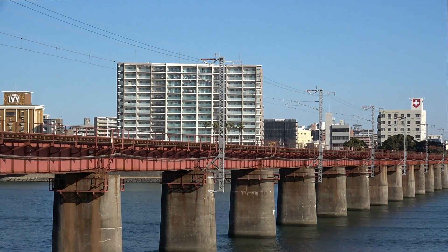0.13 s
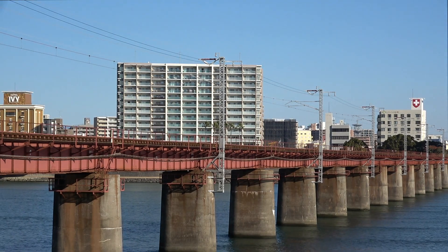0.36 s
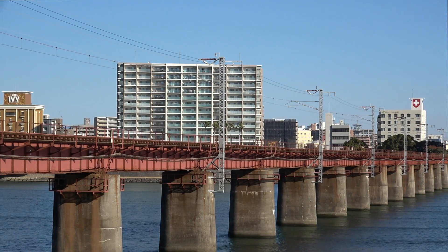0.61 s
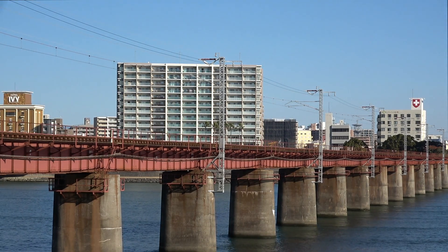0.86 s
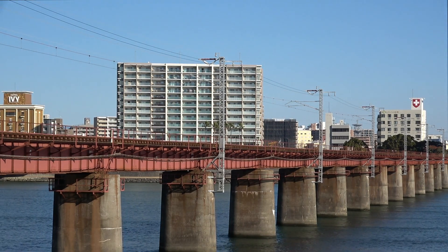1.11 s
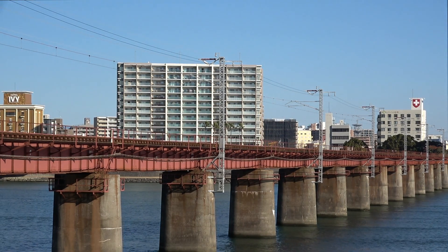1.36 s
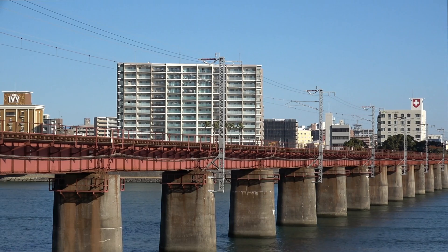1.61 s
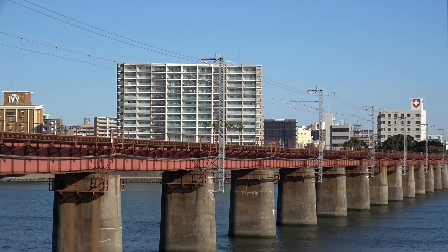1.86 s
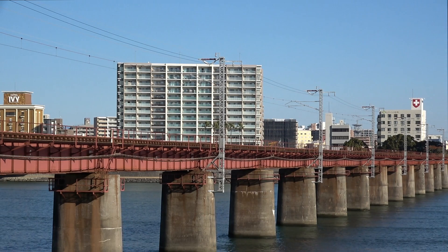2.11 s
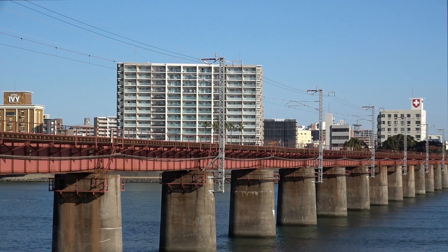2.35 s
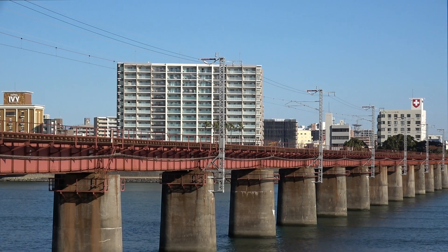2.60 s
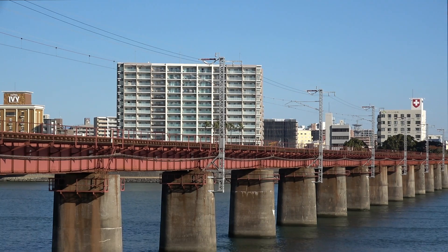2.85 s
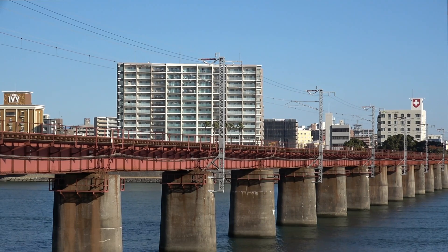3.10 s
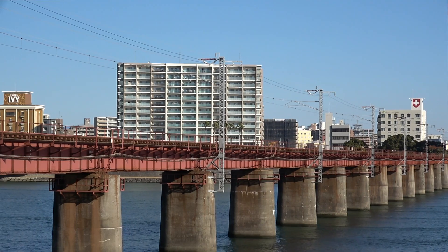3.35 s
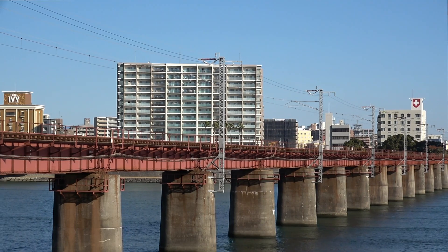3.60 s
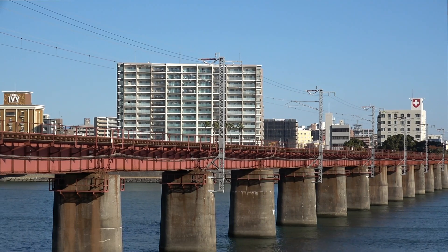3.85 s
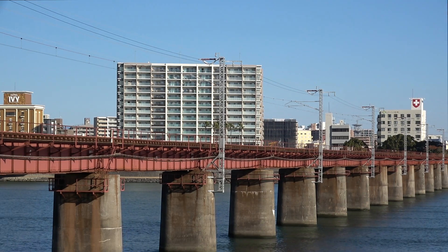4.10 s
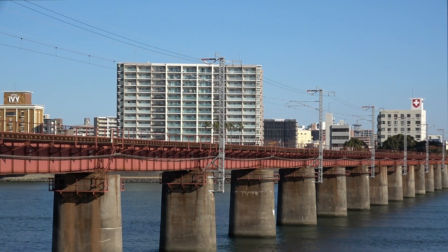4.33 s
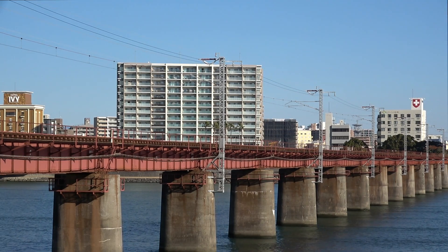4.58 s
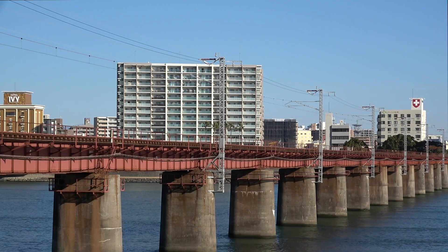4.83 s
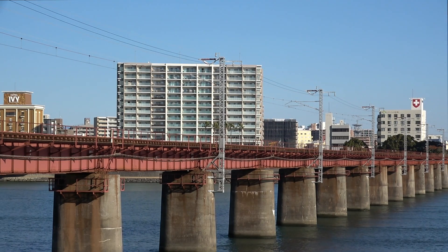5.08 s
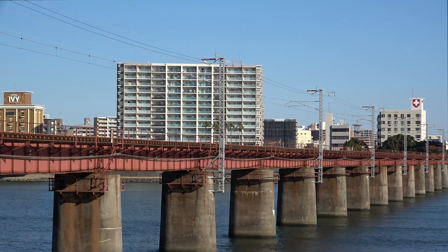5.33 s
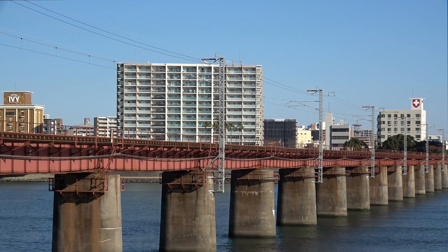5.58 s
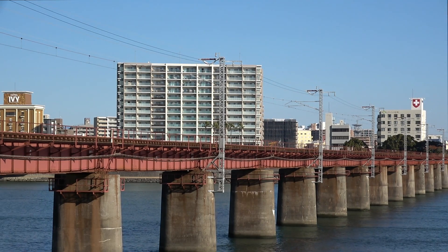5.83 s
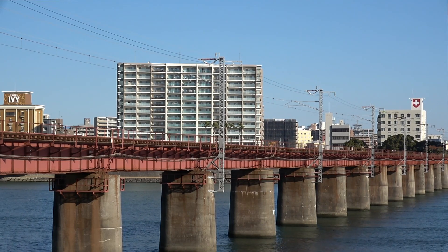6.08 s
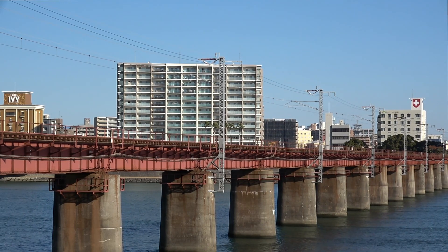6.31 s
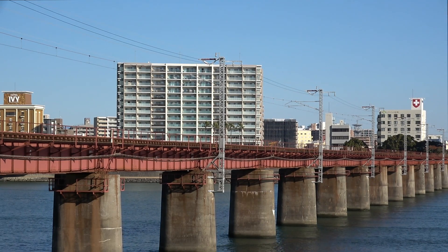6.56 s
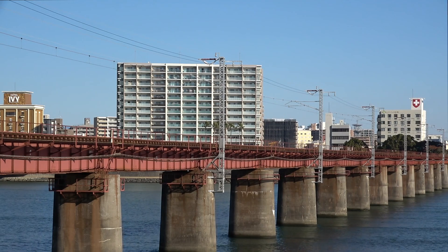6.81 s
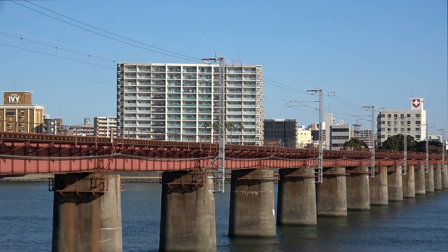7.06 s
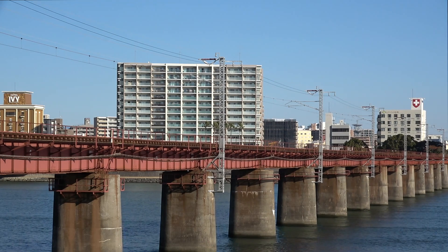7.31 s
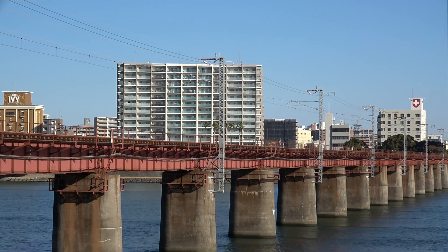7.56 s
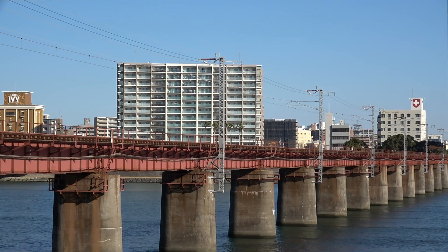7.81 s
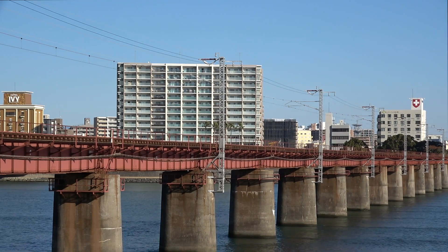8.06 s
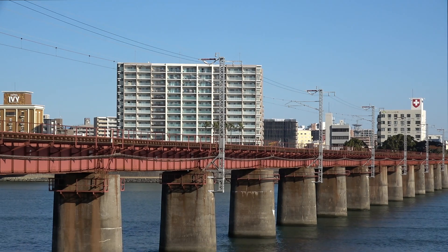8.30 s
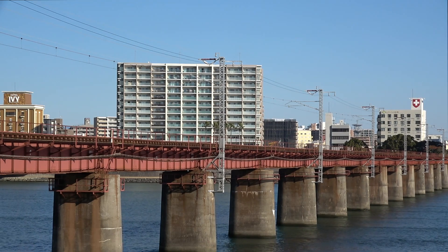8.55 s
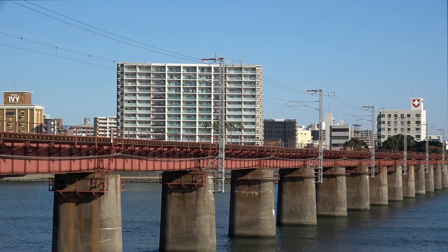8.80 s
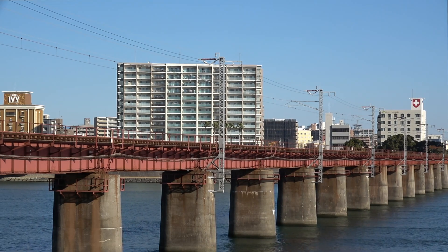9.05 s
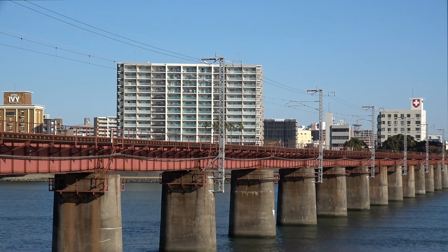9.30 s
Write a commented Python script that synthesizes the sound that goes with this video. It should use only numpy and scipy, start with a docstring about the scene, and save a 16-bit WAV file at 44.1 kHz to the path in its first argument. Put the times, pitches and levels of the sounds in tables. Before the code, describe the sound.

Already at full force, a passing train makes the bridge thunder: deep deck boom, rough girder roar, metallic clacks and ringing wheel rims. The last wheels pass by two seconds, then joint knocks continue evenly into the distance, softening with humming girders. After seven seconds mostly steady far traffic and water murmur remain, with faint distant knocks and one sliding bird whistle. Open riverside, stereo microphone, brighter left, slight far-bank echo.

```python
"""Train leaving a steel girder bridge

An electric train has just passed on a girder bridge over a river and rolls away, its treble stronger at left.
Girders roar and boom as banded noise; knocks over rail joints are noise bursts with beating span and rail modes.
Wheel rims, deck and girders ring as noise through narrow resonances; short squeals are falling tones.
Behind: a far-bank echo, one whistled bird call with its wall echo, and town murmur as steady banded noise."""
import sys
import numpy as np
from scipy import signal
from scipy.fft import rfft, irfft, next_fast_len
from scipy.io import wavfile

SR = 44100
rng = np.random.default_rng(int(sys.argv[2]) if len(sys.argv) > 2 else 0)


def makeup_ratio(level_db):
    """Linear amplitude ratio for a level in decibels (20 dB per factor of ten)."""
    decades = np.asarray(level_db, float) / 20
    return 10 ** decades


def log_audio(samples):
    """Write samples as a 16-bit WAV file to the path given in sys.argv[1]."""
    # one column per channel
    frames = np.atleast_2d(samples).T
    # limit to full scale, then quantise
    limited = np.clip(frames, -1, 1)
    pcm = np.round(limited * 32767).astype(np.int16)
    wavfile.write(sys.argv[1], SR, pcm)


N = 415422
STEP = 32   # samples per control step
TIME = np.arange(N // STEP + 2) * STEP / SR
BANDS = 22 * 2 ** (np.arange(30) / 3.15)   # band edges, Hz
BAND_HZ = np.sqrt(BANDS[1:] * BANDS[:-1])
RUN_IN = 4096   # samples


def at_hz(points, hz):
    """Spectrum table read on a log axis, falling away outside its ends."""
    f, db = np.transpose(points)
    outside = np.maximum(np.log2(f[0] / hz), 0) + np.maximum(np.log2(hz / f[-1]), 0)
    return np.interp(np.log(hz), np.log(f), db) - 30 * outside


def in_time(rows):
    """Curve columns at the control rate."""
    s, *columns = np.transpose(rows)
    return [np.interp(TIME, s, c) for c in columns]


def full_rate(slow):
    """Control rate to sample rate."""
    return np.interp(np.arange(N) / STEP, np.arange(len(slow)), slow)


def drift(rate_hz):
    """Slow chance at the control rate: twice-lowpassed noise, spread 1."""
    r = np.exp(-2 * np.pi * rate_hz * STEP / SR)
    slow = signal.lfilter([1], [1, -2 * r, r * r], rng.standard_normal(len(TIME) + 2000))[2000:]
    return slow / np.std(slow)


def gate(start, end, edge_s):
    """One between start + edge and end, with linear edges."""
    return np.clip(np.minimum(TIME - start, end + edge_s - TIME) / edge_s, 0, 1)


def band_power(spectrum, db):
    """Power per band and time of a spectrum whose whole level follows db."""
    share = makeup_ratio(at_hz(spectrum, BAND_HZ)) ** 2 * np.diff(BANDS)
    return np.outer(share / share.sum(), makeup_ratio(db) ** 2)


def band(k, x):
    """One band of the bank; white noise of spread 1 leaves with spread 1."""
    sos = signal.butter(3, BANDS[k:k + 2], "band", fs=SR, output="sos")
    # mirrored run-in: the sound is already going at the start
    run_in = np.concatenate([x[..., RUN_IN:0:-1], x], axis=-1)
    return signal.sosfilt(sos, run_in)[..., RUN_IN:] * np.sqrt(SR / 2 / (BANDS[k + 1] - BANDS[k]))


def resonance(gain, hz, width_hz):
    """Noise under a slow gain, twice through one narrow resonance; spread 1 for gain 1."""
    r = np.exp(-np.pi * width_hz / SR)
    b = [(1 - r * r) / 2, 0, (r * r - 1) / 2]
    a = [1, -2 * r * np.cos(2 * np.pi * hz / SR), r * r]
    noise = rng.standard_normal(N) * full_rate(gain) * np.sqrt(2 * SR / np.pi / width_hz)
    return signal.lfilter(b, a, signal.lfilter(b, a, noise))


# last wheels rolling away [t/s, roar level/dB, distance/m]
TRAIN = [(0, -14.5, 7.2), (.42, -17.5, 14), (.7, -14.5, 16), (1.2, -20.5, 9.4), (1.5, -21.5, 16),
         (2.12, -19.5, 17), (2.4, -25.5, 27), (2.83, -31, 27), (3.3, -30.5, 38), (3.7, -36, 49),
         (4.2, -36.5, 93), (5, -40.5, 160), (5.4, -41, 230), (6.1, -40, 220), (6.6, -38.5, 190),
         (7.05, -41, 410), (9.42, -41, 380)]
# bogie on a span, deck held booming [from t/s, to t/s, boom level/dB, roar level/dB]
BOGIES = [(-.1, 0.157, -22.5, -18), (0.625, 0.878, -15.5, -16.5), (0.98, 1.237, -17.5, -13.5),
          (1.227, 1.369, -24, -39), (1.813, 2.083, -16, -12.5), (8.423, 8.678, -35.5, -40.5)]
# spectrum shapes of rumble, deck boom, girder roar, rail hiss [f/Hz, level/dB per Hz]
RUMBLE = [(12, -38), (20, -14), (48, 5), (92, 1.5), (120, -9.5), (160, -27.5), (260, -120)]
BOOM = [(53, -36), (90, -11.5), (103, -6), (135, 0), (189, -2.5), (226, -2), (264, -7.5), (330, -2.5),
        (430, -30), (730, -120)]
ROAR = [(120, -36), (200, -4), (240, -2), (300, -4.5), (519, -3), (741, -5), (1080, -10.5), (1300, -14.5),
        (1500, -19.5), (2000, -20.5), (2600, -55), (4400, -120)]
RAIL_HISS = [(1400, -1.5), (1830, -6.5), (2560, -6), (2890, -6), (3330, -14.5), (5000, -24), (7000, -31),
             (10000, -45.5), (15500, -65.5)]
# levels at -30 dB roar, and share of the roar's swing
BOOM_DB, BOOM_FOLLOWS = -34.0, 0.67
HISS_DB, HISS_FOLLOWS = -44.0, 0.75
# rumble through ground and piers: level at 10 m, loss per doubling of distance, rise on the long girders
RUMBLE_DB, RUMBLE_DB_PER_DOUBLING, GIRDER_RUMBLE_DB = -27.5, 3, 2


def train(patchy_db=2.0, together_db=0.5):
    """Rough steel on steel as noise band by band, dulled by air, with knocks and resonances on top."""
    roar_db, distance_m = in_time(TRAIN)
    boom_db = BOOM_DB + BOOM_FOLLOWS * (roar_db + 30)
    hiss_db = HISS_DB + HISS_FOLLOWS * (roar_db + 30)
    rumble_db = RUMBLE_DB - RUMBLE_DB_PER_DOUBLING * np.log2(distance_m / 10)
    rumble_db = rumble_db + GIRDER_RUMBLE_DB * gate(ENTER_S, LEAVE_S, .3)
    knocks, ticks = joints()
    treble = band_power(RAIL_HISS, hiss_db)
    deck = sum(makeup_ratio(db) * gate(start, end, 0.0039) for start, end, db, _ in BOGIES)
    girders = sum(makeup_ratio(db) * gate(start, end, 0.026) for start, end, _, db in BOGIES)
    rolling = band_power(RUMBLE, rumble_db) + band_power(RUMBLE, piers())
    rolling = rolling + band_power(BOOM, boom_db) + band_power(ROAR, roar_db) + treble
    rolling = rolling + band_power(BOOM, [0]) * deck ** 2 + band_power(ROAR, [0]) * girders ** 2
    power = rolling * makeup_ratio(together_db * drift(20)) ** 2 + knocks
    power = power * makeup_ratio(-air_db(BANDS[1:], distance_m)) ** 2
    white = rng.standard_normal((2, N))      # neighbouring bands get unrelated noise
    out = 0
    for k, p in enumerate(power):
        gain = full_rate(np.sqrt(p) * makeup_ratio(patchy_db * drift(10.2)))
        out = out + band(k, white[k % 2] * gain)
    out = out + deck_modes(deck) + girder_hum() + drone() + squeals() + span_rings()
    return out + rims(treble.sum(axis=0) + ticks, distance_m)


AIR_DB_PER_M_AT_4K = 0.05


def air_db(hz, distance_m):
    """Air swallows the treble with distance."""
    return AIR_DB_PER_M_AT_4K * np.multiply.outer((np.asarray(hz) / 4000) ** 1.9, distance_m)


ENTER_S, LEAVE_S = 2.3, 5.05


def on_girders(s):
    """One while the wheels are on the long girders."""
    return float(ENTER_S < s < LEAVE_S)


# knock parts against its level; clack and tick rise with their share of the sharpness
THUD_DB, CLACK_DB, CLACK_FOLLOWS, TICK_DB, TICK_FOLLOWS = -14.5, -15, 0.82, -25.5, 1.2
GIRDER_THUD_DB, GIRDER_CLACK_DB = 2.5, 2   # rise on the long girders


def clack_db(s, db, sharp_db):
    """Clack level: sharper knocks and the long girders clang more."""
    return db + CLACK_DB + CLACK_FOLLOWS * sharp_db + GIRDER_CLACK_DB * on_girders(s)


# wheels on rail joints, mostly a bogie's two axles in turn
# [t/s, level/dB, sharpness/dB, span f/Hz, t60/s]; also played by span_rings and piers
JOINTS = [(0.009, -5, 3.5, 277, 0.18), (0.488, 0.5, -2, 533, 0.087), (0.606, -9, 9, 467, 0.19),
          (0.732, -9, 7.5, 383, 0.41), (0.984, -9.5, 8.5, 561, 0.9), (1.109, -5.5, 11.5, 335, 0.3),
          (1.339, -11.5, 2, 531, 0.19), (1.484, -8.5, 0, 272, 0.16), (1.689, -9.5, 2, 304, 0.24),
          (1.829, -8, 11.5, 573, 0.41), (1.96, -2.5, 8.5, 248.5, 0.38), (2.334, -7.5, 3.5, 295, 0.22),
          (2.463, -9, 6.5, 251, 0.23), (2.546, -13.5, 0.7, 298, 0.4), (2.602, -9.5, 2, 263, 0.12),
          (2.671, -16, 4.5, 309, 0.28), (2.724, -12.5, 1.8, 250, 0.19), (2.811, -14.5, -4, 433, 0.087),
          (2.934, -8, -3.5, 334, 0.14), (3.063, -11, -4.5, 346, 0.14), (3.198, -9, 2, 303, 0.24),
          (3.329, -9, 3.5, 287, 0.32), (3.464, -12.5, 1.2, 280, 0.19), (3.593, -14, 0.8, 290, 0.2),
          (3.714, -25, 1, 283, 0.15), (3.808, -12, -5, 295, 0.61), (3.866, -15, 0.5, 363, 0.18),
          (3.924, -15.5, 1, 349, 0.34), (3.992, -10.5, 0.5, 299, 0.17), (4.05, -16.5, 1.5, 254, 0.18),
          (4.205, -16, 0, 309, 0.29), (4.339, -14, 1, 294, 0.16), (4.475, -12.5, -23, 386, 0.091),
          (4.611, -18.5, -4, 394, 0.096), (4.756, -15, 3.5, 262, 0.15), (4.814, -20.5, 3.5, 292, 0.15),
          (4.894, -11.5, 1, 286, 0.19), (4.959, -28.5, 11.5, 435, 0.11), (5.113, -13, -3.5, 316, 0.22),
          (5.25, -12, -2.5, 359, 0.15), (5.38, -13.5, -20, 490, 0.081), (5.528, -10, -1, 319, 0.17),
          (5.666, -12, 4, 351, 0.17), (5.802, -16, -24, 398, 0.13), (5.933, -19.5, -1, 380, 0.18),
          (6.467, -13.5, 1.5, 338, 0.18), (6.612, -12.5, -0.7, 318, 0.16), (6.733, -20.5, -16, 360, 0.2),
          (6.875, -20, 3, 533, 0.12), (7.266, -27, 7, 364, 0.25), (7.414, -19, -3, 483, 0.068),
          (8.433, -28, 12, 280, 0.09), (8.55, -25.5, 1, 420, 0.54)]
# tick spectrum shape [f/Hz, level/dB per Hz]
TICK = [(1500, 4), (2840, -4.5), (3900, -12), (5500, -23.5), (8000, -30.5), (11000, -35.5), (15500, -40.5)]


def joints(rise_s=0.0018, span_db=-9.0, span_width=0.45, treble_shorter=0.063, clatter_db=2.0,
           hold=1.13, lead=0.68):
    """Each knock is a burst in the steel: low thud, ring of its span, clack and tick; the highs die first."""
    power, ticks = 0, 0
    lasting = (BAND_HZ[:, None] / 300) ** -treble_shorter
    early = np.minimum(lead / np.diff(BANDS), .012)[:, None]      # a narrow band needs time to build up
    clatter = makeup_ratio(clatter_db * drift(45)) ** 2      # axle, fastenings and plates answer unevenly
    for s, db, sharp_db, span_hz, t60 in JOINTS:
        near = slice(max(round((s - .02) * SR / STEP), 0), round((s + .6) * SR / STEP))
        t = np.maximum(TIME[near] - s + early, 0)
        rise = (1 - np.exp(-t / rise_s)) ** 2
        # sound from the length of the span arrives spread out: the burst holds, then drops
        fall = makeup_ratio(-60 * (t / (max(t60, .05) * lasting)) ** hold) ** 2
        dying = np.zeros((len(BAND_HZ), len(TIME)))
        dying[:, near] = rise * fall
        span = [(span_hz * 2 ** (-2 * span_width), -20), (span_hz, 0), (span_hz * 2 ** (2 * span_width), -20)]
        thud_db = db + THUD_DB + GIRDER_THUD_DB * on_girders(s)
        body = band_power([(90, -7), (250, -3)], [thud_db]) + band_power(span, [db + span_db])
        body = body + band_power([(550, -1), (900, 7.0), (1600, -14.5)], [clack_db(s, db, sharp_db)])
        tick = band_power(TICK, [db + TICK_DB + TICK_FOLLOWS * sharp_db]) * dying
        power, ticks = power + body * dying + tick, ticks + tick.sum(axis=0)
    return power * clatter, ticks


def span_rings(ring_db=-11.5, clang_db=-7.5, spread=0.253, rise_s=0.0014, hold=0.93):
    """Every blow sets close modes of its span and the rail going at once: a hard start, then beating."""
    out, t = np.zeros(N + SR), np.arange(SR // 2) / SR
    detune = rng.uniform(-1, 1, (len(JOINTS), 6))
    for (s, db, sharp_db, span_hz, t60), d in zip(JOINTS, detune):
        span = np.sin(2 * np.pi * np.outer(span_hz * 2 ** (spread * d[:3]), t)).sum(axis=0)
        rail = np.sin(2 * np.pi * np.outer(780 * 2 ** (.13 * d[3:]), t)).sum(axis=0)
        dying = (1 - np.exp(-t / rise_s)) * makeup_ratio(-60 * (t / max(t60, .05)) ** hold)
        at = round(s * SR)
        modes = makeup_ratio(db + ring_db) * span + makeup_ratio(clack_db(s, db, sharp_db) + clang_db) * rail
        out[at:at + len(t)] += dying * modes
    return out[:N]


PIER_DB, PIER_T60_S = -18, 0.67   # against the knock


def piers():
    """Level in dB of the low shudder that knocks on the long girders leave in the piers."""
    power = 0
    for s, db, *_ in JOINTS:
        if on_girders(s):
            level_db = db + PIER_DB - 60 * np.maximum(TIME - s, 0) / PIER_T60_S
            power = power + makeup_ratio(level_db) ** 2 * (TIME > s)
    return 10 * np.log10(power + 1e-12)


# nearest deck's modes [f/Hz, width/Hz, level/dB against the boom]
DECK = [(136.5, 7.7, -5), (164, 24, -8.5), (231.4, 51, -3)]


def deck_modes(deck):
    """The deck's narrow modes ring under the bogies' boom."""
    return sum(resonance(deck * makeup_ratio(db), hz, width_hz) for hz, width_hz, db in DECK)


# nearest girders droning as the last coach leaves [until t/s, f/Hz, width/Hz, level/dB]
DRONE = (1.46, 530, 220, -20)


def drone():
    """The nearest girders drone on one broad mode, then fade."""
    until, hz, width_hz, db = DRONE
    return resonance(makeup_ratio(db) * gate(-1, until, 0.18), hz, width_hz)


HUM_HZ, HUM_WIDTH_HZ, HUM_PEAK_DB = 426, 59, -32.5
SWELL_DB_PER_S, SAG_DB_PER_S, LEAVE_DB_PER_S, LEAVE_DB = 2, 1.3, 12, 11.0


def girder_hum():
    """Long girders hum on one mode: swell up to entering, slow sag, extra drop after leaving."""
    sag = SWELL_DB_PER_S * np.maximum(ENTER_S - TIME, 0) + SAG_DB_PER_S * np.maximum(TIME - ENTER_S, 0)
    drop = np.clip(LEAVE_DB_PER_S * (TIME - LEAVE_S), 0, LEAVE_DB)
    return resonance(makeup_ratio(HUM_PEAK_DB - sag - drop), HUM_HZ, HUM_WIDTH_HZ)


# wheel rims and rail [f/Hz, width/Hz, relative level/dB]
RIMS = [(1910, 87, -3.5), (2124, 110, -10), (2790, 190, -3.5), (3420, 380, -22), (3750, 330, -10),
        (4650, 300, -15.5), (5300, 300, -24.5), (5860, 220, -25), (6500, 170, -32), (7470, 150, -30),
        (8800, 220, -35)]
# one rim mode sings out [t/s, length/s, mode f/Hz, rise/dB]
SINGS = [(0.973, 0.05, 2790, 10), (0.978, 0.08, 3750, 6), (.99, .09, 4650, 11), (1.334, .17, 6500, 10),
         (1.7, 0.11, 5860, 13), (2.33, 0.04, 3750, 9), (2.46, 0.09, 3420, 23), (2.8, .08, 2790, 10.5),
         (2.93, .06, 2790, 7.5), (5.677, 0.045, 1910, 14), (5.68, .04, 2790, 7)]
RIMS_DB_PER_DOUBLING = 0.6   # rims sink into the rail hiss with distance


def rims(drive, distance_m, waver_db=2.0, rims_db=-5.0):
    """Rail roughness and ticks drive narrow wheel modes, each swelling on its own."""
    out = 0
    far_db = RIMS_DB_PER_DOUBLING * np.log2(distance_m / 10)
    for hz, width_hz, db in RIMS:
        sings_db = sum(up * gate(s, s + length, .02) for s, length, mode, up in SINGS
                       if abs(mode / hz - 1) < .045)
        level_db = db + sings_db + rims_db + waver_db * drift(1.7) - air_db(hz, distance_m) - far_db
        out = out + resonance(np.sqrt(drive) * makeup_ratio(level_db), hz, width_hz)
    return out


# rubbing flange [t/s, length/s, from f/Hz, to f/Hz, level/dB]
SQUEALS = [(1.285, .085, 2270, 2130, -31), (1.74, .095, 1990, 1860, -32)]


def squeals(waver=.008, octave_db=-16.5, flutter_db=4.0):
    """A flange rubs: wavering tones with a faint octave swell and fade while they fall."""
    out, t = 0, np.arange(N) / SR
    for s, length, from_hz, to_hz, db in SQUEALS:
        share = np.clip((t - s) / length, 0, 1)
        hz = (from_hz + (to_hz - from_hz) * share) * (1 + waver * full_rate(drift(70)))
        level = makeup_ratio(db + flutter_db * full_rate(drift(40))) * np.sin(np.pi * share) ** .7
        phase = 2 * np.pi * np.cumsum(hz) / SR
        out = out + np.sqrt(2) * level * (np.sin(phase) + makeup_ratio(octave_db) * np.sin(2 * phase))
    return out


# bird call [t/s, f/Hz, level/dB]
BIRD = [(8.61, 1970, -48), (8.642, 3420, -47), (8.675, 3700, -52), (8.73, 3620, -46), (8.793, 3370, -43.5),
        (8.799, 3080, -46.5), (8.886, 2520, -42.5), (8.896, 2260, -51), (8.975, 1850, -53)]
BIRD_OCTAVE_DB, BIRD_ECHO_S, BIRD_ECHO_GAIN_DB = -26.5, .165, -9.5


def bird(scatter_s=0.016):
    """A whistle with a faint octave sweeps up and slides down; a far wall returns it scattered."""
    s, hz, db = np.transpose(BIRD)
    t = np.arange(N) / SR
    phase = 2 * np.pi * np.cumsum(np.interp(t, s, hz) * (1 + 0.006 * full_rate(drift(60)))) / SR
    edges = np.clip(np.minimum(t - s[0], s[-1] - t) / 0.0092, 0, 1)
    level = np.sqrt(2) * makeup_ratio(np.interp(t, s, db)) * edges
    call = level * (np.sin(phase) + makeup_ratio(BIRD_OCTAVE_DB) * np.sin(2 * phase))
    wall = rng.standard_normal(SR // 10) * np.exp(-t[:SR // 10] / scatter_s)
    echo = signal.fftconvolve(np.roll(call, round(BIRD_ECHO_S * SR)), wall / np.linalg.norm(wall))[:N]
    # the small wall returns highs best
    echo = signal.sosfilt(signal.butter(2, 3000, "high", fs=SR, output="sos"), echo)
    return call + makeup_ratio(BIRD_ECHO_GAIN_DB) * echo


# town spectrum shape [f/Hz, level/dB per Hz]
TOWN = [(12, -44), (20, -20), (98, 0), (180, -12), (221, -8), (367, -9.5), (403, 4.5), (474, -23),
        (735, -11), (1110, -15), (1730, -20.5), (1980, -26.5), (5000, -72.5), (6500, -92), (11000, -120)]
TOWN_DB = -36
# left-right likeness [f/Hz, likeness/1]
TOWN_LIKENESS = [(60, 0.98), (140, 1), (340, 1), (820, 0.66), (1960, 1), (4700, 0.23)]


def town(patchy_db=0.5):
    """Far traffic and water: banded noise, least alike in the two channels at the top."""
    out, white = 0, rng.standard_normal((2, 2, N))
    for k, p in enumerate(band_power(TOWN, [TOWN_DB])[:26, 0]):
        mid, side = band(k, white[k % 2])
        alike = np.clip(np.interp(BANDS[k], *np.transpose(TOWN_LIKENESS)), 0, 1)
        gain = np.sqrt(p / 2) * full_rate(makeup_ratio(patchy_db * drift(5.1)))
        out = out + gain * (np.sqrt(1 + alike) * mid + np.sqrt(1 - alike) * side * [[1], [-1]])
    return out


# far bank and buildings [left echo t/s, right echo t/s, level/dB]
BANK = (0.074, 0.073, -24.5)


def scene():
    """Mono train and bird in a two-channel town; the far bank returns the train at its own lag per channel."""
    near = train()
    echo = np.array([np.pad(near, (round(lag * SR), 0))[:N] for lag in BANK[:2]])
    return near + makeup_ratio(BANK[2]) * echo + bird() + town()


LIMIT_DB, RELEASE_DB_PER_S = 0, 62


def limiter(x):
    """Gain ducks almost at once under peaks above the limit and recovers steadily."""
    over = np.maximum(20 * np.log10(np.abs(x).max(axis=0) + 1e-9) - LIMIT_DB, 0)
    ramp = RELEASE_DB_PER_S * np.arange(N) / SR
    duck_db = np.maximum.accumulate(over + ramp) - ramp
    return x * makeup_ratio(-signal.lfilter([.05], [1, -.95], duck_db))


def band_limit(x):
    """A steep low-pass at the top of the band."""
    return signal.sosfilt(signal.butter(12, 15700, fs=SR, output="sos"), x)


# channel tilt [f/Hz, left minus right level/dB]
LEFT_MORE = [(60, -1.5), (110, 1.3), (210, 2.5), (390, 4.8), (730, 8), (1350, 11.8), (2520, 13.5),
             (4700, 12.5), (9000, 8), (15000, 5)]
FADE_IN_S, MIC_HISS_GAIN_DB = .004, -66.5


def record(dry):
    """The right capsule is shaded from the treble; each capsule hisses; a limiter acts and peaks are rounded."""
    size = next_fast_len(N + RUN_IN)
    hz = np.fft.rfftfreq(size, 1 / SR) + 1
    tilt_hz, tilt_db = np.transpose(LEFT_MORE)
    right = makeup_ratio(-np.interp(np.log(hz), np.log(tilt_hz), tilt_db))
    shade = np.array([2 / (1 + right), 2 * right / (1 + right)])
    fade_in = np.minimum(np.arange(N) / SR / FADE_IN_S, 1)
    x = irfft(rfft(dry * fade_in, size) * shade, size)[:, :N]
    hiss = signal.lfilter([1], [1, -.55], rng.standard_normal((2, N)))
    hiss = hiss + 0.18 * hiss[::-1]      # the preamplifier shares part of it
    x = limiter(x) + makeup_ratio(MIC_HISS_GAIN_DB) * hiss
    return band_limit(np.tanh(x / 1.271) * 1.132)


dry = scene()
out = record(dry)
log_audio(out)
```